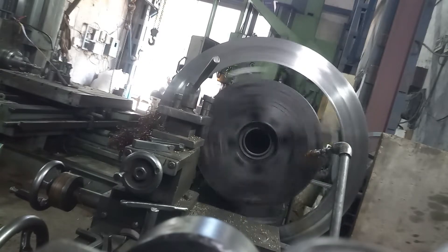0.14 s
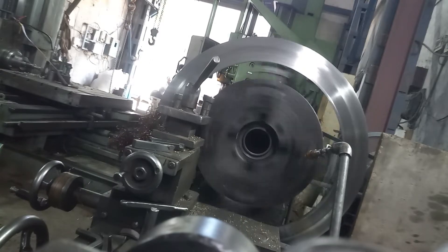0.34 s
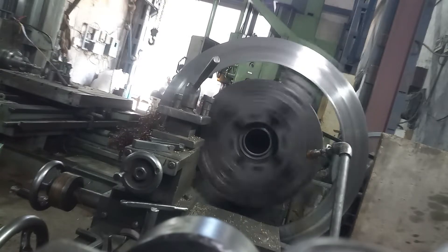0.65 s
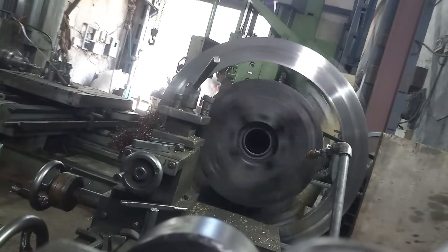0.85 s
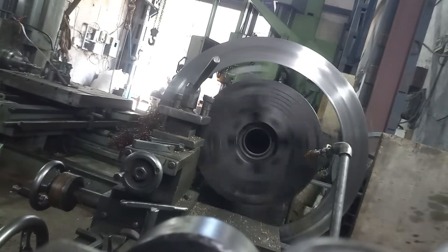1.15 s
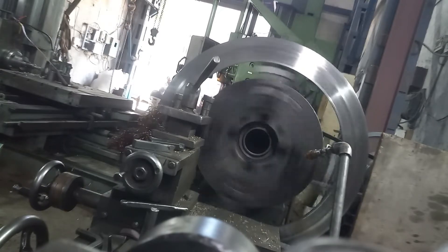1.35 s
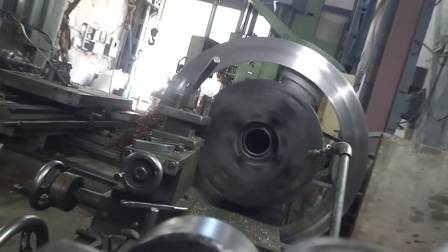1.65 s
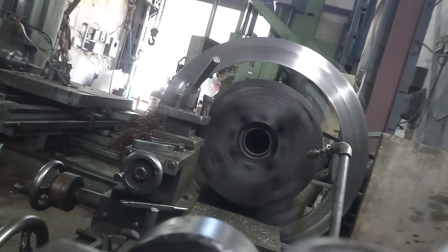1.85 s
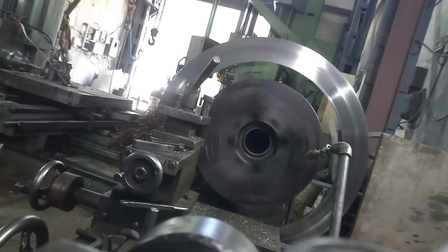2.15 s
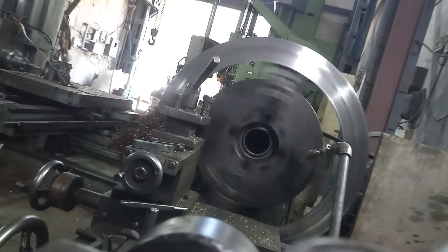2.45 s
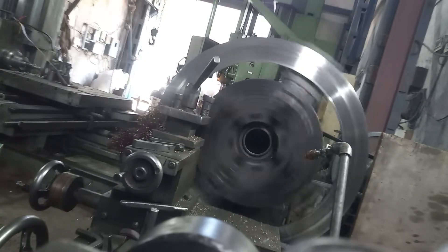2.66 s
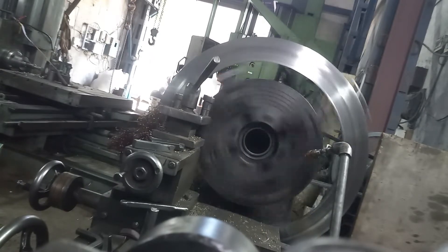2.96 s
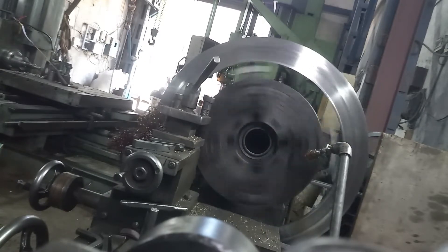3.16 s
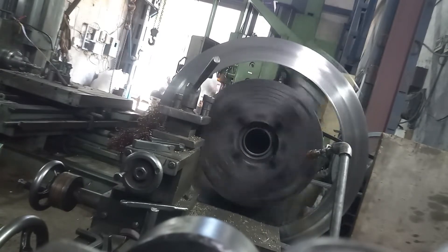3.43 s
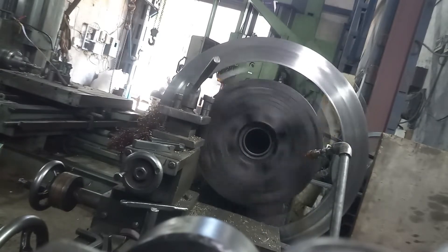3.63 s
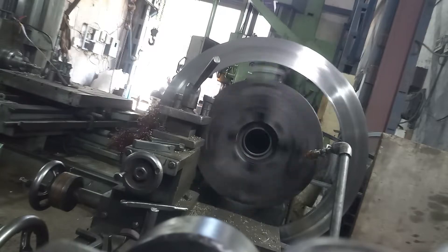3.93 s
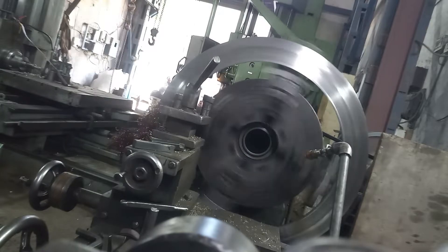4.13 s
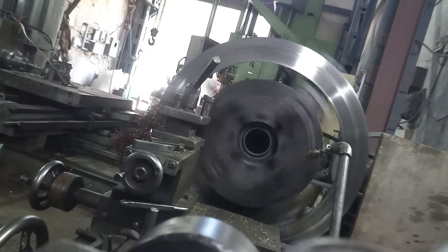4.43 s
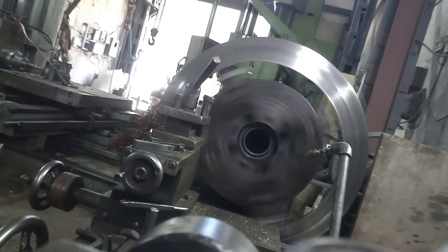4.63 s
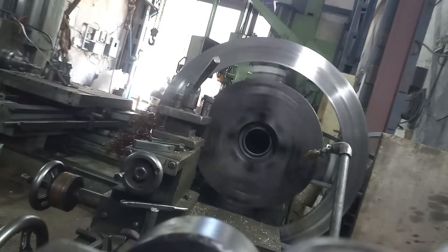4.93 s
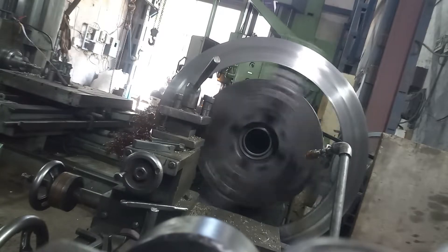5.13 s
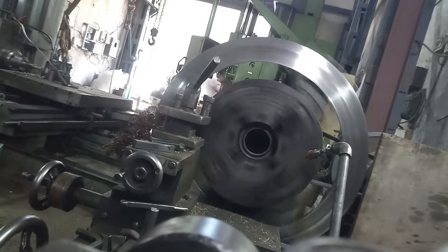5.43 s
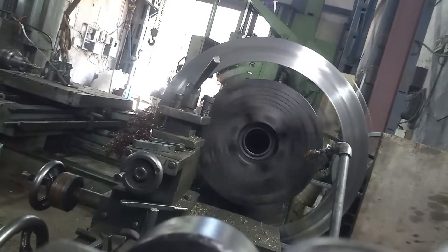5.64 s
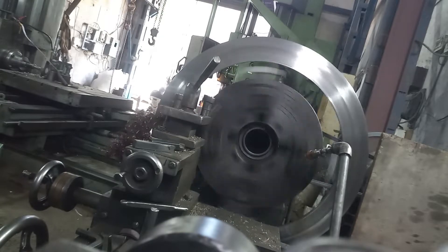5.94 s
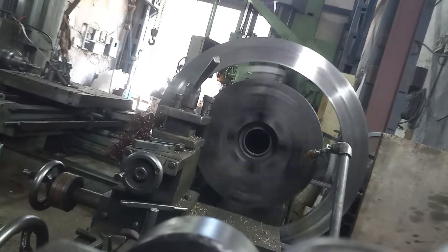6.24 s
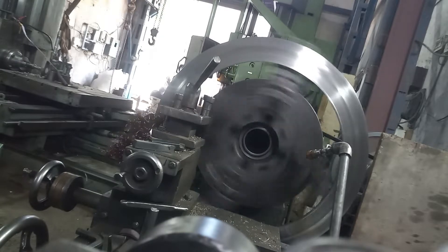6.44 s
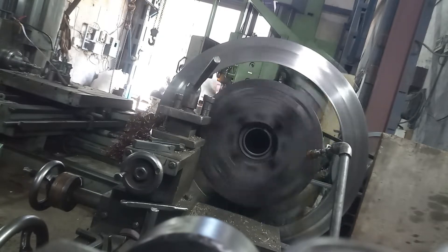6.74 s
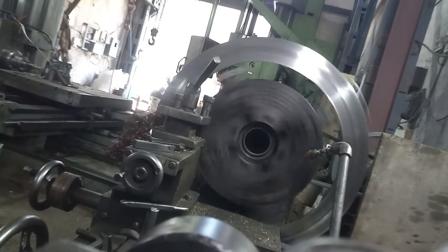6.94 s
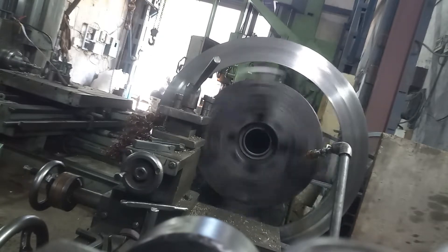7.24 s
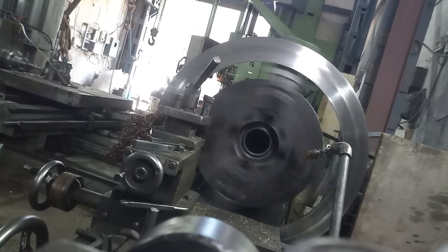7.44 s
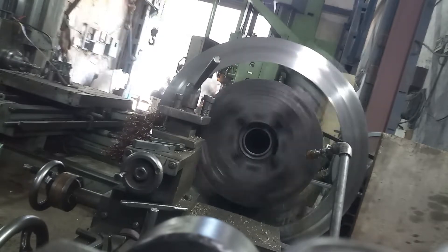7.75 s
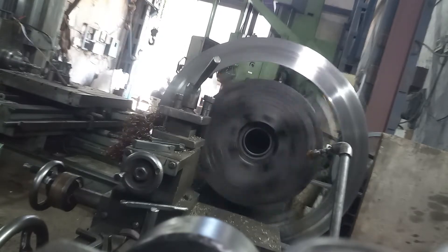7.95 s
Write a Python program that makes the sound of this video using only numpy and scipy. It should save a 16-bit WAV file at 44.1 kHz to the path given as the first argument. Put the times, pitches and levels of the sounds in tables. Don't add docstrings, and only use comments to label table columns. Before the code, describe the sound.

Harsh, very high metallic screeching pulses about twice a second, with gaps, above the constant low rumble and whirr of a running workshop lathe.

```python
import sys
import numpy as np
from scipy import signal
from scipy.fft import rfft, irfft
from scipy.io import wavfile
from scipy.ndimage import uniform_filter1d

SR = 44100
rng = np.random.default_rng(int(sys.argv[2]) if len(sys.argv) > 2 else 0)


def ratio_of_db(decibels):
    return 10 ** (np.asarray(decibels, float) / 20)


def file_out(sig):
    cols = np.atleast_2d(sig).T
    lim = np.clip(cols, -1, 1)
    pcm = np.round(lim * 32767).astype(np.int16)
    wavfile.write(sys.argv[1], SR, pcm)


N = 356328

# [pitch_hz, density_db]
MACHINE_SPECTRUM = [(15, -86), (25, -45), (113, -6), (284, -4), (339, -3.5), (470, -3.5), (546, -13.5),
                    (667, -10), (1690, -13.5), (2010, -12.5), (2460, -10), (4960, -14), (5910, -20),
                    (7400, -22), (10000, -49.5), (13000, -90), (22000, -120)]
# [pitch_hz, level_db]
WHINES = [(199.2, -43), (732.1, -51), (1244, -49), (1626, -48), (1723, -48), (2503, -43), (3122, -51),
          (3257, -48), (3548, -49), (3903, -52), (4167, -48), (4700, -48)]
# [time_s, level_db]
MACHINE_LOUDNESS = [(0.0, -28.5), (0.11, -29.5), (0.13, -27.5), (1.06, -31), (2.45, -28.5), (5.47, -27.5),
                    (5.92, -25.5), (6.55, -25.5), (6.59, -23.5), (6.73, -26.5), (7.0, -26), (7.83, -27.5),
                    (8.06, -20), (8.08, -20.5)]
SWING_SHARES = [0.87, 0.98, 0.85]
UNEVEN_DB = 0.22

# [pitch_hz, density_db]
HISS_SPECTRUM = [(8000, -40), (9600, -26), (10200, -9), (11500, -7), (11750, -13), (12200, -5), (13300, -5),
                 (13700, 0), (14100, -1), (14400, -8), (15200, -3), (15900, -5)]
# [pitch_hz, density_db]
SCRAPE_SPECTRUM = [(4500, -27), (5300, -3.5), (6000, -1.5), (7300, -6.5), (8400, -16), (9200, -33)]
# [pitch_hz, width_hz, level_db]
RUB_MODES = [(5770, 40, 0), (7200, 70, -5), (7800, 50, -10)]
# [pitch_hz, level_db]
RING_LINES = [(6245, -56), (6519, -52), (6788, -58), (7025, -57), (7176, -55), (7289, -55), (7547, -57),
              (7811, -57), (8328, -61),
              (11208, -75), (11972, -73), (12118, -74), (13087, -71), (13695, -70), (14233, -71)]
# [mid_turn_s, hiss_db, rub_db, easing_at_end_db]
TURNS = [(0, -51, -40, -4), (.42, -48.5, -42, -8), (.87, -49.5, -44, -8.5), (1.31, -51.5, -36, -12),
         (1.76, -53.5, -41, -11), (2.2, -50, -45, -4), (2.65, -50, -39, -3), (3.09, -49, -38, -7),
         (3.53, -47.5, -37, -8), (3.98, -48, -37, -7), (4.42, -49.5, -43, -9), (4.87, -49.5, -32.5, -5.5),
         (5.31, -50, -38, -3), (5.76, -49.5, -35, -8.5), (6.2, -49.5, -34, -8), (6.65, -48, -38, -3),
         (7.09, -47.5, -30, -8.5), (7.54, -51, -37, -7.5), (8.08, -46, -29, 2)]
HOLDER_HZ, HOLDER_WIDTH_HZ, HOLDER_DB = 3343, 27, -5
EASE_LEAD_S, EASE_WIDTH_S, RUB_EASES, RUB_FLICKER_DB = 0.0053, 0.037, 2.4, 2.5
SQUEAL_THINS_HISS_DB, THIN_S = -1.5, 0.087

TURN_S, FIRST_EASE_S = 0.4446, -0.2446
# [after_easing_s, level_db]
BITE = [(0, -17), (.022, -9), (.042, -5.5), (.07, -1.5), (.35, -2), (.39, -7), (.4446, -22)]
# [after_easing_s, level_db]
STIFFNESS = [(0, -6), (.07, -2.5), (.17, -5), (.21, -2.5), (.245, 0), (.265, -8.5), (.29, 1), (.315, -5.5),
             (.4446, 3)]
# [after_easing_s, level_db]
UPPER_WANE = [(0, 2), (.28, -0.5), (.4, -2), (.4446, 0)]
# [full_at_s, growth_db_per_s, squeal_db, upper_db, overtones_db]
SQUEALS = [(-.2, 900, -9.5, -31, -35.5), (0.239, 909, -8, -26, -37.5), (.68, 907, -10.5, -29, -39),
           (1.728, 297, -10.5, -18, -33), (2.0, 898, -8.5, -25, -34.5), (2.45, 900, -8, -24, -34),
           (2.89, 896, -8.5, -25, -35.5), (3.34, 900, -9, -20, -33), (3.78, 900, -9.5, -23.5, -35),
           (4.23, 900, -9, -21, -32.5), (5.273, 653, -9, -17.5, -31), (6.152, 798, -12, -13, -31),
           (6.45, 900, -9, -16, -30)]
# [time_s, half_length_s, level_db]
FALSE_STARTS = [(1.35, 0.054, -35.5), (4.7, 0.017, -28), (4.906, 0.043, -33), (5.72, 0.046, -34),
                (5.896, 0.054, -38), (6.934, .04, -28), (7.09, 0.073, -33.5), (7.4, .05, -40),
                (7.567, 0.046, -36), (7.897, 0.043, -33), (8.036, 0.051, -27)]
# [time_s, half_length_s, level_db]
FADES = [(0.142, .02, -2), (0.353, 0.027, 0), (0.862, 0.022, -7), (1.044, 0.052, -1.5), (2.07, .03, -1),
         (2.179, 0.025, -5), (2.49, .04, -2), (2.937, 0.032, -0.5), (3.092, 0.024, -22), (3.17, 0.015, 5),
         (3.46, 0.017, 4), (4.12, .04, -2), (4.541, 0.018, 0.5), (5.482, 0.012, 6.5), (6.28, 0.051, 2.5),
         (6.393, 0.034, 9), (6.737, 0.018, 6)]
UPPER_FOLLOWS, OVERTONE_FOLLOWS, FADING_DB = 1, 1.1, 1.64
UPPER_LEAD_S = 0.029
OVERTONE_LATE = 1.2
TAIL_DB, TAIL_DB_PER_S, QUIET_OVERTONE_DB, SILENT_DB = -10, 68, -30.5, -62

# [time_s, depth_db]
FURTHER_SLIPS = [(0.023, -29), (.058, -24), (.149, -19), (0.514, -38), (.577, -21), (0.837, -19), (.918, -26),
                 (0.956, -24), (1.734, -29), (1.843, -27), (1.929, -21), (2.094, -33), (2.129, -34), (2.309, -25),
                 (2.396, -27), (2.535, -34), (2.692, -30), (2.961, -12), (3.708, -28), (3.991, -25), (4.419, -27),
                 (4.475, -22), (4.572, -20), (5.328, -16), (5.35, -23), (5.409, -26), (5.51, -30), (6.294, -30),
                 (6.566, -27), (6.697, -22)]
# [after_easing_s, depth_db]
SLIP_ANGLES = [(.022, -19), (0.061, -3), (0.094, -1.5), (0.117, -2.5), (.14, 1), (.186, -10), (0.199, -15),
               (.213, -9), (.232, -9.5), (0.254, -9.5), (0.274, -10.5), (0.302, -23), (.315, -4),
               (.333, -5), (0.354, -8), (.377, -7.5), (0.398, -9.5), (.418, -18), (0.436, -12)]
SLIP_S, SLIP_JITTER_S, SLIP_APART_S = 0.0055, 0.003, 0.009
SLIP_SPREAD_DB, LEAST_SLIP_DB = 4, -7

# [time_s, pitch_hz]
CHATTER_PITCH = [
    (0, 5198),
    (7.3, 5198),
    (7.45, 5262),
    (8.08, 5268),
]
# [pitch_hz, width_hz, level_db]
UPPER_MODES = [(5420, 18, 0), (5478, 19, -1), (5545, 26, -3), (5640, 50, -11), (5320, 26, -7)]
LOWER_HZ, LOWER_WIDTH_HZ, LOWER_DB = 4958, 16, -12
# [time_s, level_db]
THIRD_LEVEL = [(0, 3), (1.2, 2), (2.2, 0), (3.2, -2), (8.08, -2)]

# [pitch_hz, level_db]
MICROPHONE_COLOUR = [(7250, -1), (7400, -4.5), (7750, -1), (8450, 0.5), (8600, -1), (9300, -3.5),
                     (9650, -2), (10000, -4)]
CUTOFF_HZ = 15760


def unit(x):
    return x / np.sqrt(np.mean(np.abs(x) ** 2) + 1e-20)


def in_time(rows):
    s, *columns = np.transpose(rows)
    return [np.interp(np.arange(N) / SR, s, c) for c in columns]


def round_turn(rows):
    return np.interp((np.arange(N) / SR - FIRST_EASE_S) % TURN_S, *np.transpose(rows))


def drift(rate):
    r = np.exp(-40 * np.pi * rate / SR)
    noise = rng.standard_normal(N // 20 + 4002)
    slow = signal.lfilter([1], [1, -2 * r, r * r], noise)[4000:]
    return np.interp(np.arange(N) / 20, np.arange(len(slow)), unit(slow))


def mode(hz, width_hz):
    wander = drift(width_hz) + 1j * drift(width_hz)
    return unit(wander * np.exp(2j * np.pi * hz * np.arange(N) / SR))


def modes(rows):
    return unit(sum(ratio_of_db(db) * mode(hz, width_hz) for hz, width_hz, db in rows))


def coloured(spectrum, patchy_db, rate):
    hz = np.maximum(np.arange(N // 2 + 1) * SR / N, 1)
    points = np.array(spectrum)
    colour_db = np.interp(np.log(hz), np.log(points[:, 0]), points[:, 1])
    shaped = rfft(rng.standard_normal(N)) * ratio_of_db(colour_db)
    band = np.floor(3 * np.log2(hz)).astype(int) % 6
    return unit(sum(ratio_of_db(patchy_db * drift(rate)) * irfft(shaped * (band == k), N) for k in range(6)))


def machine():
    roar = coloured(MACHINE_SPECTRUM, patchy_db=0.59, rate=3.4)
    for pitch_hz, level_db in WHINES:
        roar = roar + ratio_of_db(level_db + 32.0 + 1.4 * drift(0.86)) * np.real(mode(pitch_hz, width_hz=7.7))
    hz, spectrum = np.arange(N // 2 + 1) * SR / N, rfft(roar)
    part = np.digitize(hz, [540, 1900])
    loudness_db = in_time(MACHINE_LOUDNESS)[0]
    swing_db = loudness_db - np.mean(loudness_db)
    swells = 0
    for k, share in enumerate(SWING_SHARES):
        swells = swells + ratio_of_db(share * swing_db + UNEVEN_DB * drift(1.5)) * irfft(spectrum * (part == k), N)
    return ratio_of_db(-25.5) * swells


def chip_flow(squealing):
    t, keep = np.arange(N) / SR, np.exp(-1 / (THIN_S * SR))
    hiss_db, rub_db, _ = in_time(TURNS)
    eased = np.zeros(N)
    for k, (_, _, _, easing_db) in enumerate(TURNS):
        ease_s = FIRST_EASE_S + (k + 1) * TURN_S - EASE_LEAD_S
        eased += easing_db * np.exp(-((t - ease_s) / EASE_WIDTH_S) ** 2 / 2)
    thin = signal.lfilter([1 - keep], [1, -keep], squealing * 1., zi=[keep])[0]
    hiss_db = hiss_db + eased + SQUEAL_THINS_HISS_DB * thin
    return hiss_db, rub_db + RUB_EASES * eased + RUB_FLICKER_DB * drift(14.5)


def chip(squealing):
    hiss_db, rub_db = chip_flow(squealing)
    hiss = ratio_of_db(hiss_db + 10.0) * coloured(HISS_SPECTRUM, patchy_db=2.0, rate=22)
    scrape = ratio_of_db(hiss_db + 11.5) * coloured(SCRAPE_SPECTRUM, patchy_db=4.0, rate=21)
    rub = ratio_of_db(rub_db + 1.5) * np.real(modes(RUB_MODES))
    holder = ratio_of_db(rub_db + HOLDER_DB) * np.real(mode(HOLDER_HZ, HOLDER_WIDTH_HZ))
    ring = 0
    for pitch_hz, level_db in RING_LINES:
        ring = ring + ratio_of_db(level_db + 4 + 1.5 * drift(2)) * np.real(mode(pitch_hz, width_hz=8))
    ring = ring * ratio_of_db(0.22 * (hiss_db - np.mean(hiss_db)))
    return hiss + scrape + rub + holder + ring


def slip_times():
    luck = rng.standard_normal((len(TURNS), len(SLIP_ANGLES), 2))
    after_s, usual_db = np.transpose(SLIP_ANGLES)
    turn_start_s = FIRST_EASE_S + TURN_S * np.arange(len(TURNS))[:, None]
    times_s = turn_start_s + after_s + SLIP_JITTER_S * luck[..., 0]
    depths_db = usual_db + SLIP_SPREAD_DB * luck[..., 1]
    rows = list(FURTHER_SLIPS)
    for s, depth_db in zip(times_s.ravel(), depths_db.ravel()):
        clear = min(abs(s - further_s) for further_s, _ in FURTHER_SLIPS) > SLIP_APART_S
        if clear and depth_db < LEAST_SLIP_DB:
            rows.append((s, depth_db))
    return [row for row in rows if 0 < row[0] < N / SR - .05]


def slips():
    gain, t = np.ones(N, complex), np.arange(N) / SR
    for s, depth_db in slip_times():
        way = rng.choice([-1, 1])
        near = slice(max(round((s - .04) * SR), 0), round((s + .04) * SR))
        u = (t[near] - s) / SLIP_S
        gain[near] *= -np.tanh(u) + 1j * way * ratio_of_db(depth_db) / np.cosh(u)
        gain[near.stop:] *= -1
    return gain


def chatter():
    t, bite = np.arange(N) / SR, round_turn(BITE)
    turn = (t - FIRST_EASE_S) // TURN_S
    level, upper, overtone = np.full((3, N), SILENT_DB - 40.)
    for s, growth, level_db, upper_db, overtone_db in SQUEALS:
        now = turn == (s - FIRST_EASE_S) // TURN_S
        grown = np.minimum(growth * (t[now] - s), 0)
        upper_grown = np.minimum(growth * (t[now] - s + UPPER_LEAD_S), 0)
        level[now] = level_db + grown + bite[now]
        upper[now] = upper_db + upper_grown + UPPER_FOLLOWS * bite[now]
        overtone[now] = overtone_db + OVERTONE_LATE * grown + OVERTONE_FOLLOWS * bite[now]
    tail = np.maximum.accumulate(level + TAIL_DB_PER_S * t) - TAIL_DB_PER_S * t + TAIL_DB
    fades = sum(db * np.exp(-((t - s) / half_s) ** 2) for s, half_s, db in FADES)
    main_db = level + fades + round_turn(STIFFNESS) + FADING_DB * drift(9)
    power = ratio_of_db(2 * main_db) + ratio_of_db(2 * tail) + ratio_of_db(2 * SILENT_DB)
    for s, half_s, level_db in FALSE_STARTS:
        power = power + ratio_of_db(2 * level_db) * np.exp(-((t - s) / half_s) ** 2)
    heard = 10 * np.log10(power)
    upper = np.maximum(upper + round_turn(UPPER_WANE) - heard, -10)
    overtone = np.maximum(overtone - heard, QUIET_OVERTONE_DB)
    return heard, upper, overtone, level > -35


def squeal(level_db, upper_db, overtone_db):
    tone = np.exp(2j * np.pi * np.cumsum(in_time(CHATTER_PITCH)[0]) / SR)
    upper, lower = modes(UPPER_MODES), mode(LOWER_HZ, LOWER_WIDTH_HZ)
    waver = np.exp(2j * np.pi * np.cumsum(8 * drift(14)) / SR)
    loose = ratio_of_db(np.clip(-24 - level_db, -8, 8))
    flicker = (1 + loose * mode(0, width_hz=40)) / np.sqrt(1 + loose ** 2)
    main = tone * waver * slips() * flicker
    main = main + ratio_of_db(-24) * mode(5100, width_hz=150)
    first = ratio_of_db(6.04) * main + ratio_of_db(np.minimum(upper_db, 0)) * (upper + ratio_of_db(LOWER_DB) * lower)
    second = tone * mode(0, width_hz=24) + ratio_of_db(-2) * upper + ratio_of_db(-15) * lower
    second = unit(tone * second) + ratio_of_db(-17) * tone * mode(4800, width_hz=90)
    third = tone * mode(0, width_hz=26)
    third = third + ratio_of_db(-9) * mode(4900, width_hz=60) + ratio_of_db(-9) * mode(5270, width_hz=30)
    third = ratio_of_db(in_time(THIRD_LEVEL)[0]) * unit(tone ** 2 * third)
    together = ratio_of_db(-.6) * first + ratio_of_db(overtone_db) * (second + third)
    return ratio_of_db(level_db) * np.sqrt(2) * np.real(together)


def scene():
    *levels, squealing = chatter()
    return (machine() + chip(squealing) + squeal(*levels))[None]


def band_limit(x):
    return signal.sosfilt(signal.butter(12, 15960, fs=SR, output="sos"), x)


def record(dry):
    hz, colour = np.arange(N // 2 + 1) * SR / N, np.array(MICROPHONE_COLOUR)
    heard = irfft(rfft(dry) * ratio_of_db(np.interp(hz, colour[:, 0], colour[:, 1])), N)
    height = uniform_filter1d(np.abs(signal.hilbert(heard)), size=44)
    limited = heard / (1 + (height / .96) ** 6) ** (1 / 6)
    top_cut = signal.ellip(14, .3, 90, CUTOFF_HZ, fs=SR, output="sos")
    finished = signal.sosfilt(top_cut, limited)
    return band_limit(finished)


dry = scene()
out = record(dry)
file_out(out)
```